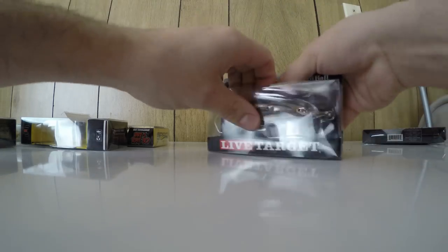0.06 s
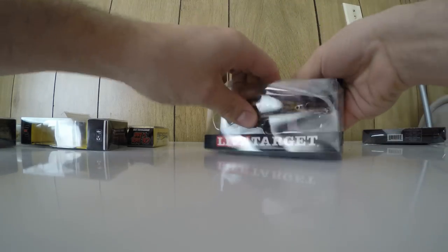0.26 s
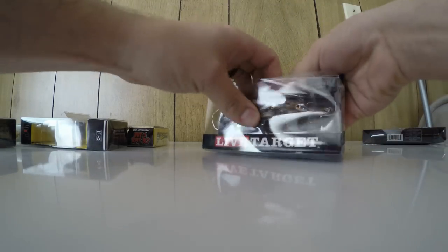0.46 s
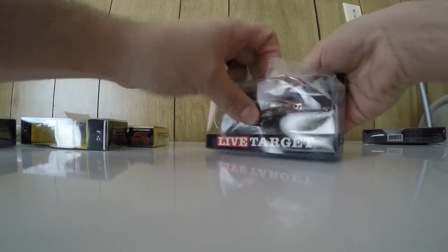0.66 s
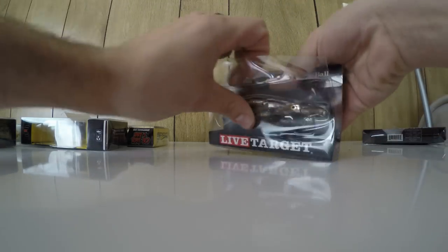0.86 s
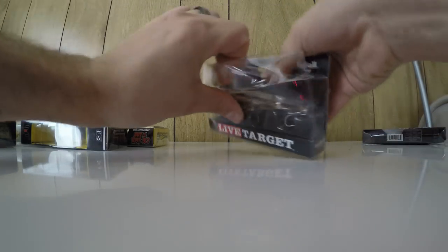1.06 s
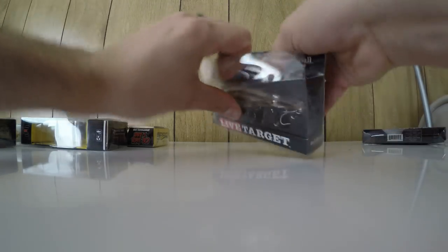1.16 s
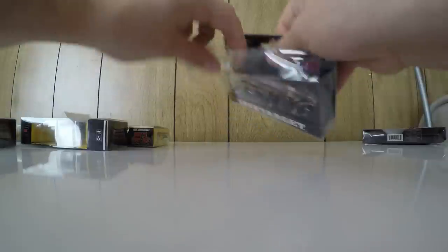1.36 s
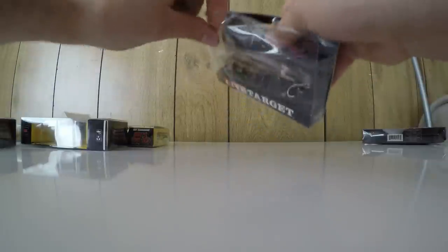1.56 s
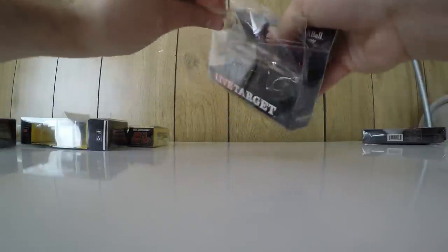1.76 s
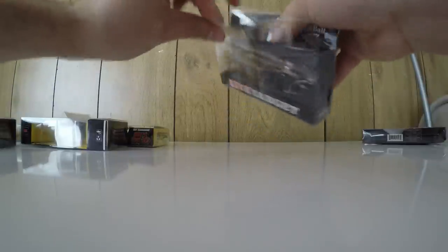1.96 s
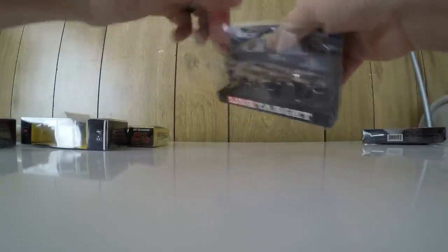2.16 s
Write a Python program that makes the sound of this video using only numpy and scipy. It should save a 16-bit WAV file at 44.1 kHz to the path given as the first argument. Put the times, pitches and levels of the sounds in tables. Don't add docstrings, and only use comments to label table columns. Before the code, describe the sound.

Hands open a small plastic and card package: light crinkling and quick ticks, then hard loud snaps, a quieter sliding stretch, and a final burst of cracks. Close microphone at a table in a small room.

```python
import sys
import numpy as np
from scipy import signal
from scipy.fft import rfft, irfft, next_fast_len
from scipy.io import wavfile
from scipy.ndimage import uniform_filter1d, map_coordinates

SR = 44100
rng = np.random.default_rng(int(sys.argv[2]) if len(sys.argv) > 2 else 0)


def attenuation_scalar(level_db):
    decades = np.asarray(level_db, float) / 20
    return 10 ** decades


def store_pcm(level_fs):
    pcm = np.round(np.clip(level_fs, -1, 1) * 32767).astype(np.int16)
    wavfile.write(sys.argv[1], SR, np.atleast_2d(pcm).T)


N = 97020

# (time [s], rubbing level [dB], sharpness [dB])
RUBBING_EFFORT = [(0, -42.5, 4), (.08, -45.5, 14.5), (.12, -33.5, 7.5), (.3, -44.5, 17), (0.347, -31.5, 14),
                  (.46, -43.5, 13), (.58, -33.5, 16.5), (.67, -43.5, 14.5), (1.091, -50.5, 18.5),
                  (1.12, -43, 22.5), (1.148, -47.5, 16), (1.46, -45.5, 17.5), (1.5, -34.5, 12),
                  (1.83, -49.5, 24), (1.902, -32.5, 20.5), (2.039, -42, 15.5), (2.07, -35, 15.5),
                  (2.12, -46.5, 12)]
# (frequency [Hz], level [dB])
RUMBLE_COLOUR = [(12, -21), (20, 1.5), (60, -7), (134, -8), (226, -10), (500, -16.5), (650, -45),
                 (1100, -120)]
# (frequency [Hz], level [dB])
RUB_COLOUR = [(180, -74), (300, -4), (494, -3), (1340, 6.5), (1900, -9.5), (2070, -5), (10000, -45),
              (14200, -64), (16000, -50)]
# (pitch [Hz], level [dB], time to fall 60 dB [s])
BOX_NOTES = [(718, -7, 0.034), (950, 0, 0.019), (1080, -8.5, 0.036), (1550, -0.5, 0.014), (2393, -9, 0.016),
             (3180, -21, 0.018)]
# (frequency [Hz], level [dB])
CRACK_COLOUR = [(1470, 4.5), (2500, -7), (3980, -7), (4440, -11), (5870, -13.5), (11300, -25.5),
                (16000, -35.5)]
# (frequency [Hz], time to fall 60 dB [s])
ROOM_RINGING = [(200, 0.39), (1000, 0.24), (5000, 0.27), (14000, 0.16)]
# (time [s], body level [dB], crack level [dB], panel pitch [Hz])
SMALL_CREASES = [(0.0241, -33, -58, 1190), (0.0596, -32, -47, 1070), (0.0787, -44, -51, 950),
                 (0.1119, -24, -30, 2480), (0.1617, -36, -36, 1050), (0.1674, -23, -37, 1420),
                 (0.195, -28, -35.5, 1140), (0.2382, -27, -33.5, 1680), (0.2461, -30, -33.5, 930),
                 (0.2583, -31, -36, 960), (0.2718, -23.5, -31, 1390), (0.2956, -41, -43, 814),
                 (0.3024, -37, -40, 1030), (0.3095, -28, -37, 2380), (0.3146, -32, -32, 1060),
                 (0.3301, -34, -44, 1080), (0.3409, -27, -23, 670), (0.3468, -35, -32, 750),
                 (0.3827, -42, -37, 810), (0.4059, -32, -40.5, 790), (0.4144, -34, -32, 980),
                 (0.4206, -36, -32.5, 1430), (0.5607, -21, -23.5, 734), (0.5682, -32, -27, 676),
                 (0.5944, -26, -29.5, 670), (0.6322, -27, -32.5, 690), (0.7499, -18.5, -24.5, 685),
                 (0.7932, -9, -28, 990), (0.8009, -22, -33, 1140), (0.8612, -31, -36, 1130),
                 (0.9259, -34, -41, 1400), (0.9485, -36.5, -40, 1060), (1.0572, -47, -38, 1060),
                 (1.1129, -36, -37, 1400), (1.1945, -52, -32, 870), (1.2206, -25, -41, 1050),
                 (1.2869, -28, -49, 1000), (1.3347, -24, -32.5, 950), (1.5232, -34, -29, 1080),
                 (1.5607, -29, -33, 960), (1.5698, -37, -35, 950), (1.6483, -25, -30, 1570),
                 (1.6695, -24, -35, 1170), (1.6826, -14, -31, 930), (1.7307, -18.5, -28, 1190),
                 (1.7819, -27, -31, 3000), (2.1278, -37, -39, 1020), (2.1484, -30, -37.5, 1650),
                 (0.045, -26.5, -55, 1840),
    (1.207, -26, -44, 890),
    (1.2408, -23, -56, 670),
    (1.315, -25, -39, 830),
    (1.3255, -23.5, -34.5, 900),
]
# (time [s], body level [dB], crack level [dB], panel pitch [Hz])
CREEP_SNAPS = [(0.0338, -41, -41, 1170), (0.0402, -25, -37, 1190), (0.1022, -23.5, -57, 836),
               (0.115, -24.5, -38, 1080), (0.1248, -24, -28.5, 2280), (0.1363, -22, -30, 865),
               (0.1484, -27, -30, 1400), (0.1562, -32, -43, 1300), (0.178, -27, -36, 930),
               (0.2078, -18.5, -32, 1010), (0.2172, -7.5, -18, 1550), (0.2768, -21.5, -33.5, 2400),
               (0.287, -32, -33, 2450), (0.3237, -26, -23.5, 2140), (0.353, -19.5, -22, 2390),
               (0.3649, -22, -29, 3120), (0.3736, -11, -18.5, 1500)]
# (time [s], body level [dB], crack level [dB], panel pitch [Hz])
PRY_SNAPS = [(0.4273, -16.5, -23, 875), (0.4417, -9, -20.5, 3230), (0.4723, -18, -23, 2240),
             (0.4834, -13, -23, 2400), (0.499, -20, -25, 1930), (0.5180, -16, -29, 1980),
             (0.5269, -13.5, -24.5, 804), (0.5356, -4, -10.5, 1520), (0.5424, -12, -26, 2320),
             (0.5482, -7.5, -8, 2220), (0.5546, -7.5, -20.5, 2040), (0.617, -23, -32.5, 2080),
             (0.645, -28.5, -31, 2410), (0.6941, -24.5, -33, 1610), (0.721, -26, -41, 700),
             (0.7429, -2, -13, 967), (0.7599, -11, -19.5, 2630), (0.7635, -15, -34, 1020),
             (0.7852, 7.5, -1.5, 1576), (0.8086, -2, -16.5, 1670)]
# (time [s], body level [dB], crack level [dB], panel pitch [Hz])
SLIDE_SNAPS = [(0.96, -29.5, -37, 1100), (0.9716, -35, -37.5, 1010), (0.9853, -35, -40, 1005),
               (0.9986, -30.5, -34, 1680), (1.015, -33, -37, 1020), (1.024, -29, -40, 2300),
               (1.048, -29, -32.5, 1140), (1.0855, -23, -31.5, 1800), (1.1001, -38, -34, 1870),
               (1.1869, -14, -15.5, 1115), (1.2119, -23.5, -30.5, 1040), (1.235, -28, -32.5, 714),
               (1.277, -24.5, -42, 1230), (1.3205, -25, -32.5, 790), (1.3586, -25, -42, 970),
               (1.4259, -25.5, -34.5, 1670)]
# (time [s], body level [dB], crack level [dB], panel pitch [Hz])
PULL_SNAPS = [(1.474, -15.5, -25, 905), (1.4811, -9.5, -16, 2430), (1.4979, -12.5, -18.5, 2250),
              (1.5144, -13, -23.5, 986), (1.552, -24.5, -44, 1900), (1.5814, -20, -36, 1940),
              (1.598, -35, -50, 1530), (1.6203, -12.5, -24, 1550), (1.6264, -7, -27, 860),
              (1.6755, -3.5, -18.5, 1830), (1.7029, -16.5, -26, 1640), (1.709, -13, -23.5, 850),
              (1.737, -14, -27, 1040), (1.7474, -3.5, -8, 1010), (1.7543, -20, -21, 1080),
              (1.7734, -11.5, -15, 2830), (1.8432, -37, -33.5, 3060), (1.8621, -31, -29, 1700),
              (1.8803, -22, -38, 1030), (1.8896, -21, -32, 1760), (1.9022, -13, -27, 1740),
              (1.9055, -12, -28, 612), (1.9097, -14, -12.5, 2600), (1.9206, -3, -12, 1860),
              (1.9274, -1.5, -11, 1026), (1.999, -23.5, -32.5, 1730), (2.0641, -22.5, -34.5, 980),
              (2.0865, -23, -33, 1480), (2.1598, -24, -33, 1896)]
# (time [s], level [dB], pitch [Hz])
TABLE_PUSHES = [
    (0.195, -34, 418),
    (0.435, -33, 236),
    (0.555, -27.5, 108.2),
    (0.792, -21, 100),
    (1.477, -44.5, 235),
    (1.517, -30.5, 141),
    (1.616, -32.5, 172),
    (1.679, -30, 303),
    (1.705, -28, 193),
    (1.911, -27, 415),
]
TABLE_NOTES = [1.088, 0.574, 2.38, 1.556]
# (time [s], how much of the sound reaches it [dB])
FLAP_GRIP = [
    (.3, -40),
    (.46, -12),
    (.56, 2),
    (.66, -1),
    (.72, -40),
    (1.88, -46),
    (1.911, 9.5),
    (1.95, -33),
]


def unit(x):
    return x / np.sqrt(np.mean(x ** 2) + 1e-20)


def along(points, hz):
    f, v = np.transpose(points)
    return np.interp(np.log(hz + 1), np.log(f + 1), v)


def filtered(x, response):
    m = next_fast_len(x.shape[-1] + 4096)
    spectrum = rfft(x, m) * response(np.fft.rfftfreq(m, 1 / SR))
    return irfft(spectrum, m)[..., :x.shape[-1]]


def wobble(rate):
    knots = rng.standard_normal(int(N * rate / SR) + 4)
    return map_coordinates(knots, [np.arange(N) * rate / SR])


def place(times, rows):
    at = np.round(np.asarray(times) * SR).astype(int)[:, None] + np.arange(rows.shape[1])
    return np.bincount(at.ravel(), rows.ravel(), N + SR)[:N]


def ring(hz, db, t60, t):
    attack_s = 0.0009
    phase = rng.uniform(-1, 1, hz.shape)[..., None]
    fade = attenuation_scalar(db[..., None] - 60 * t / t60[..., None])
    notes = fade * np.sin(2 * np.pi * hz[..., None] * t + phase)
    y = notes.sum(1) * (1 - np.exp(-t / attack_s))
    return y / np.abs(y).max(1, keepdims=True)


def effort():
    s, *cols = np.transpose(RUBBING_EFFORT)
    return [np.interp(np.arange(N) / SR, s, c) for c in cols]


def slips(hiss_db=-4):
    rates = np.c_[[1100, 170]]
    tick_t60, spread_db, clump_db = 0.004, 5.5, 2
    size_db = spread_db * np.clip(rng.standard_normal((2, N)), -2, 2)
    starts = (rng.random((2, N)) < rates / SR) * attenuation_scalar(size_db)
    t = np.arange(400) / SR

    def bursts(start, t60):
        envelope = np.convolve(start, attenuation_scalar(-60 * t / t60))[:N]
        return unit(envelope * rng.standard_normal(N))

    grains = bursts(starts[0], 2 * tick_t60)
    ticks = bursts(starts[1], tick_t60)
    rough = attenuation_scalar(clump_db * wobble(25)) * (attenuation_scalar(-1) * grains + attenuation_scalar(-10) * ticks)
    hiss = attenuation_scalar(hiss_db + clump_db * wobble(40)) * rng.standard_normal(N)
    return rough + hiss


def rumble():
    rumble_db, swing_db, hiss_db, shuffle_db = -47, 3, -92, -9
    follows = 0.71
    level_db = effort()[0]

    def low_share(f):
        return 1 / (1 + (f / 128) ** 4)

    low = unit(filtered(rng.standard_normal(N), lambda f: attenuation_scalar(along(RUMBLE_COLOUR, f)) * low_share(f)))
    shuffle = unit(filtered(slips(), lambda f: attenuation_scalar(along(RUMBLE_COLOUR, f)) * (1 - low_share(f))))
    hiss = unit(filtered(rng.standard_normal(N), lambda f: 1 / (1 + f / 3000)))
    low_db = rumble_db + follows * (level_db - level_db.mean()) + swing_db * wobble(13.62)
    return attenuation_scalar(low_db) * low + attenuation_scalar(level_db + shuffle_db) * shuffle + attenuation_scalar(hiss_db) * hiss


def crack_colour(f):
    low_cut_hz = 1700
    return attenuation_scalar(along(CRACK_COLOUR, f)) / (1 + (low_cut_hz / (f + 1)) ** 4)


def box_response(f):
    total = 0.5
    for k, (hz, db, t60) in enumerate(BOX_NOTES):
        width = 3 / t60
        total = total + (-1) ** k * attenuation_scalar(db) * 1j * f * width / (hz * hz - f * f + 1j * f * width)
    return total


def crinkle():
    fizz_db, fizz_hiss_db = -20.5, -17
    level_db, sharp_db = effort()
    push = slips()
    dull = unit(filtered(push, lambda f: attenuation_scalar(along(RUB_COLOUR, f)) * box_response(f)))
    fizz = unit(filtered(0.5 * push + slips(fizz_hiss_db), crack_colour))
    return attenuation_scalar(level_db) * (dull + attenuation_scalar(fizz_db + sharp_db) * fizz)


def room(x):
    wall_s, dip_db, dip_hz = 0.006, -4, 2170
    out, step = np.zeros(N + SR), SR // 20
    for at in range(0, N, step):
        hz, t, z = signal.stft(rng.standard_normal(SR // 3), SR, nperseg=256)
        fade = attenuation_scalar(-60 * t / along(ROOM_RINGING, hz)[:, None])
        tail = signal.istft(z * fade, SR, nperseg=256)[1]
        wet = signal.fftconvolve(x[at:at + step], tail / np.linalg.norm(tail))
        out[at + round(wall_s * SR):][:len(wet)] += wet
    return filtered(out[:N], lambda f: attenuation_scalar(dip_db * np.exp(-np.log2((f + 1) / dip_hz) ** 2)))


def snap_body(panel_hz, t):
    panel_db, panel_t60, panel_fall_db = 9, 0.011, -2.5
    detune, scatter_db = 0.063, 4.5
    hz, db, t60 = np.transpose(BOX_NOTES)
    draw = rng.standard_normal((len(panel_hz), 2, len(hz)))
    notes_hz = np.c_[panel_hz, hz * (1 + detune * draw[:, 0])]
    strength_db = panel_db + panel_fall_db * np.log2(panel_hz / 1000).clip(0)
    notes_db = np.c_[strength_db, db + scatter_db * draw[:, 1]]
    return ring(notes_hz, notes_db, np.r_[panel_t60, t60][None], t)


def snap_crack(noise, rustle, ragged, tilt, t):
    crack_t60, rise_s, tear_db = 0.01, 0.00066, 3
    rustle_t60, rustle_db, rustle_top_hz = 0.032, -6.5, 6800
    rustle = rustle * attenuation_scalar(rustle_db - 60 * t / rustle_t60)
    rustle = filtered(rustle, lambda f: 1 / (1 + (f / rustle_top_hz) ** 4))
    noise = noise * attenuation_scalar(-60 * t / crack_t60) + rustle
    noise = noise * attenuation_scalar(tear_db * ragged) * (1 - np.exp(-t / rise_s))
    crack = filtered(noise, lambda f: crack_colour(f) * attenuation_scalar(tilt * np.log2((f + 500) / 6000)))
    return crack / np.sqrt(np.mean(crack[:, :SR // 300] ** 2, 1, keepdims=True))


def snaps(creases):
    s, body_db, crack_db, panel_hz = np.transpose(creases)
    t = np.arange(SR // 25) / SR
    body = snap_body(panel_hz, t)
    noise, rustle, ragged = rng.standard_normal((3, len(s), len(t)))
    ragged = unit(uniform_filter1d(ragged, size=30))
    rough = attenuation_scalar(2 * unit(uniform_filter1d(ragged, size=30)))
    tilt = 0.31 * (crack_db - body_db + 9.0)[:, None]
    crack = snap_crack(noise, rustle, ragged, tilt, t)
    return place(s, attenuation_scalar(body_db + 0.5)[:, None] * body * rough + attenuation_scalar(crack_db - 3.5)[:, None] * crack)


def thumps():
    t60, gain_db, rise_s, early_s = 0.046, 12.5, 0.0015, 0.005
    s, db, hz = np.transpose(TABLE_PUSHES)
    ratios = np.asarray(TABLE_NOTES)
    t = np.arange(SR // 10) / SR
    notes_db = 3 * rng.standard_normal((len(s), len(ratios))) - 4 * np.arange(len(ratios))
    y = ring(hz[:, None] * ratios, notes_db, np.array([[t60]]), t) * (1 - np.exp(-t / rise_s))
    return place(s - early_s, attenuation_scalar(db + gain_db)[:, None] * y)


def flap(x):
    note_hz, width_hz, gain_db = 673, 38, 2
    s, db = np.transpose(FLAP_GRIP)
    held = x * attenuation_scalar(gain_db + np.interp(np.arange(N) / SR, s, db))
    return filtered(held, lambda f: 1j * f * width_hz / (note_hz ** 2 - f * f + 1j * f * width_hz))


def scene():
    room_db = -15
    near = snaps(CREEP_SNAPS + PRY_SNAPS + SLIDE_SNAPS + PULL_SNAPS) + crinkle()
    table = attenuation_scalar(room_db) * room(near) + thumps() + rumble()
    small = snaps(SMALL_CREASES)
    plastic = near + small
    return (plastic + flap(plastic) + attenuation_scalar(room_db) * room(small) + table)[None]


def top_cut(x):
    return signal.sosfilt(signal.butter(12, 16500, fs=SR, output="sos"), x)


def record(dry):
    clip_top, hardness, top_hz = 0.88, 12, 15350
    x = dry / (1 + np.abs(dry / clip_top) ** hardness) ** (1 / hardness)
    mix = filtered(x, lambda f: 1 / (1 + (f / top_hz) ** 60))
    return top_cut(mix)


dry = scene()
out = record(dry)
store_pcm(out)
```